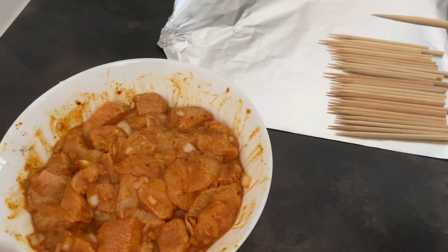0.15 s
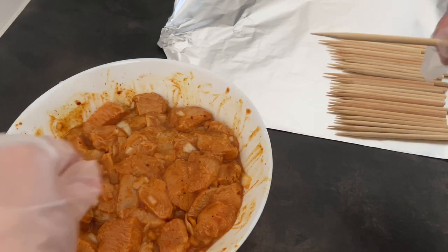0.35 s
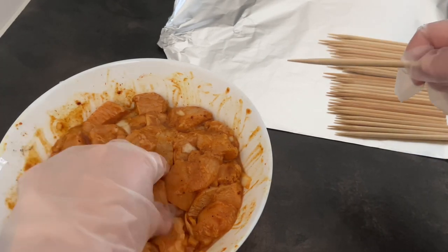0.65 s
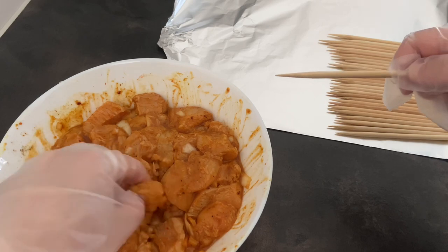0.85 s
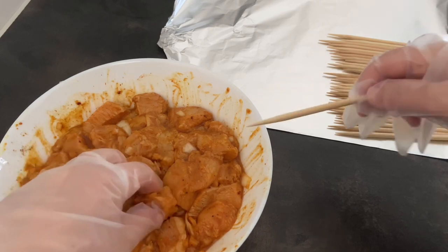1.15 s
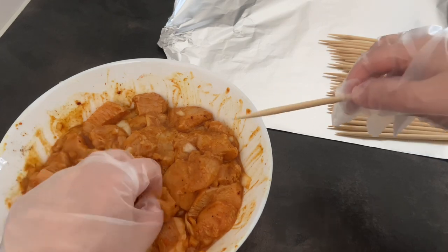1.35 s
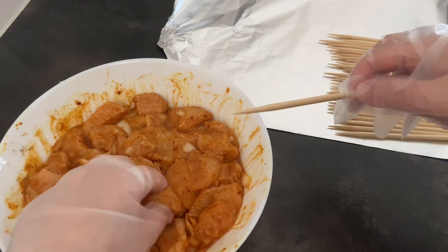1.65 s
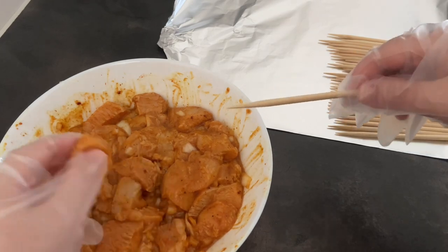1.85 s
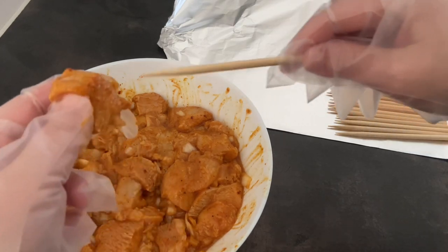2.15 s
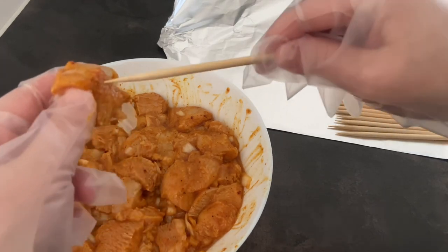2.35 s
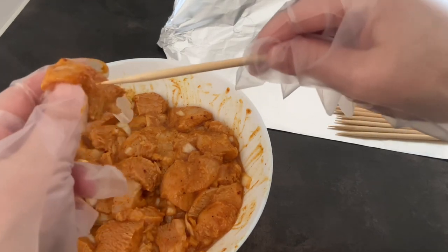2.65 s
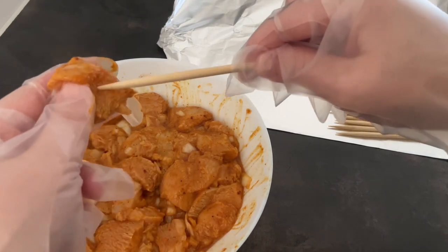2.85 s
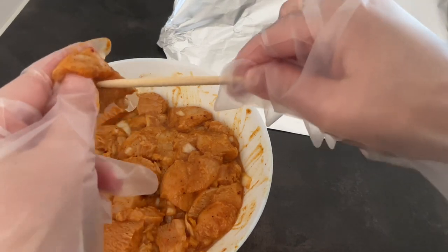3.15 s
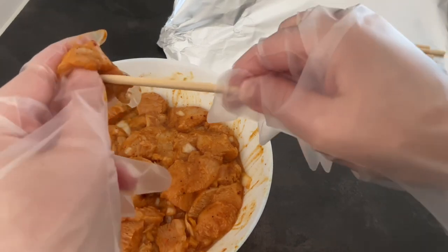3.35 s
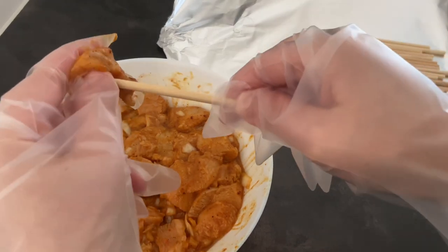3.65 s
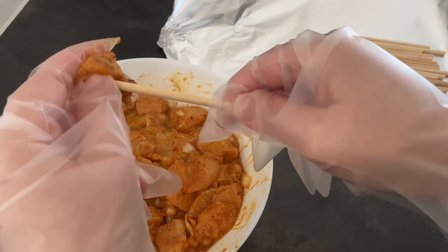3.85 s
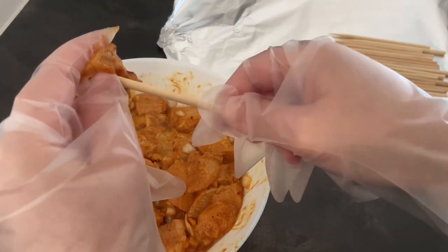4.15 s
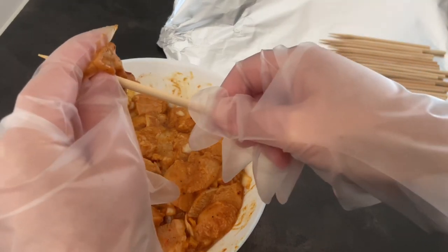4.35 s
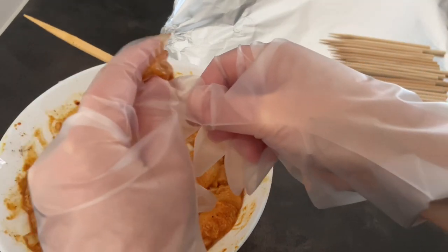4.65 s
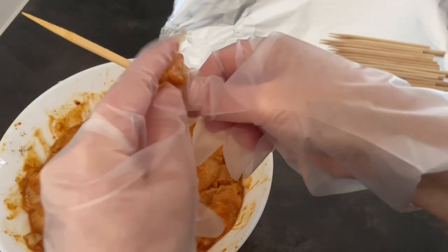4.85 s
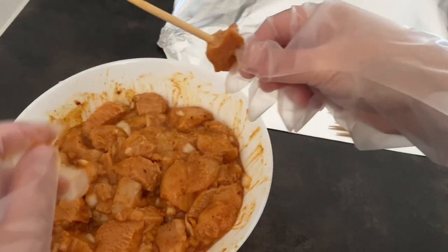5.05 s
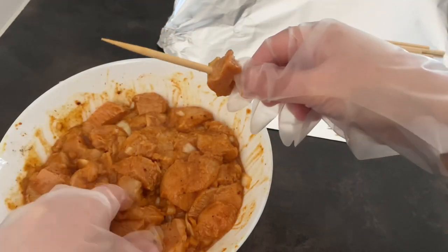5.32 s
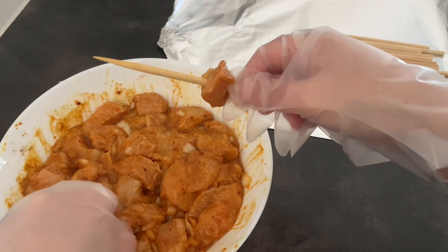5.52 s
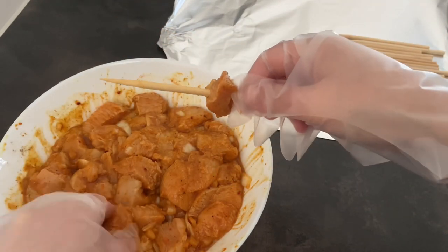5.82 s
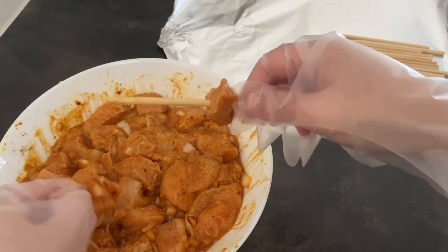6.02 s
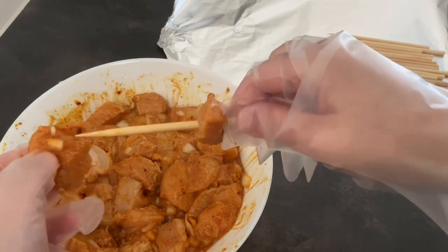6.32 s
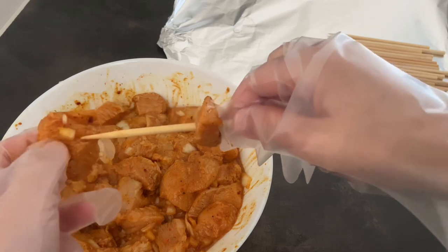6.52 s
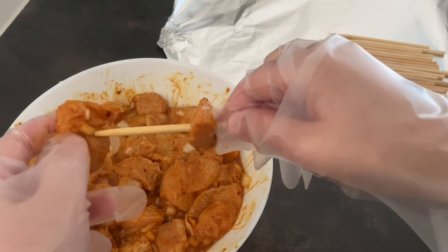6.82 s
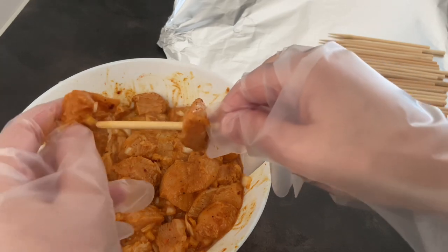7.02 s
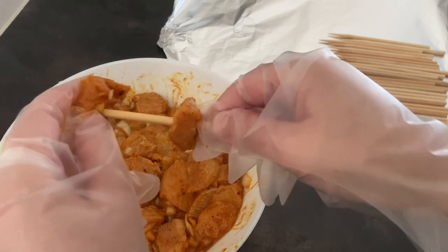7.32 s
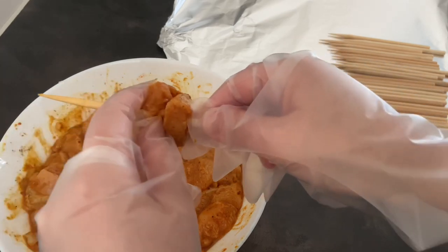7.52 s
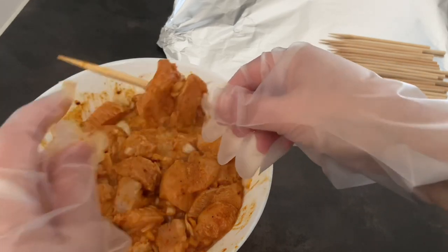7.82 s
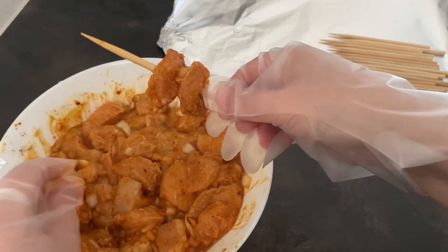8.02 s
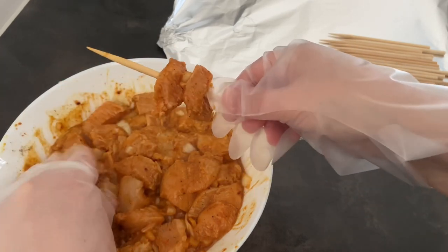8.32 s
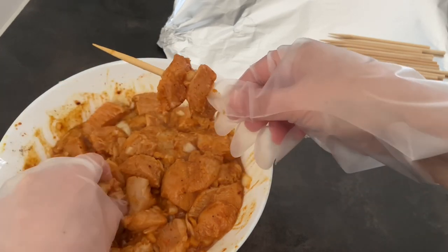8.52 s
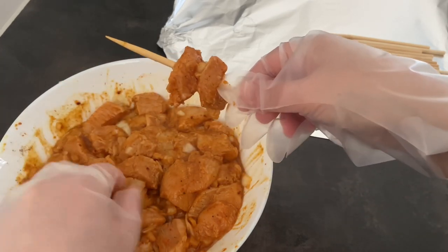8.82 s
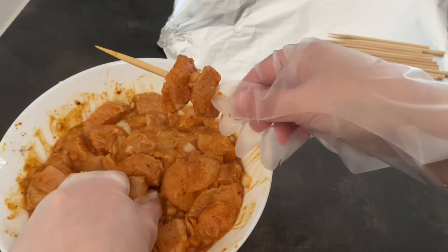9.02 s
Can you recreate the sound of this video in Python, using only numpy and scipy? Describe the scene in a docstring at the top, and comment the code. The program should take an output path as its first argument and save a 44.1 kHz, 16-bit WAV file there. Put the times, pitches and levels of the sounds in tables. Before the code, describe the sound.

Close handling of sticky marinated meat in crackly disposable gloves, with small sharp ticks, moist kneading and a constant deep motor hum.

```python
"""Skewering meat in thin gloves

Heard close up: thin plastic gloves crinkle (clouds of tiny rings over hiss) and snap (struck resonances),
marinated meat squelches and is kneaded (pops over dull noise), and wood rasps and creaks (narrow noise bursts).
Around them a small hard room answers with a noise tail, and soft bumps of bowl and hands come through.
In the background an appliance hums: drifting sines with overtones, a rush of air and a thin whistle."""
import sys
import numpy as np
from scipy import signal
from scipy.fft import rfft, irfft, next_fast_len
from scipy.io import wavfile
from scipy.ndimage import uniform_filter1d, map_coordinates

SR = 44100
rng = np.random.default_rng(int(sys.argv[2]) if len(sys.argv) > 2 else 0)


def master_out(mix):
    """Clip the mix to full scale and print it as 16-bit PCM to the path in sys.argv[1]."""
    frames = np.transpose(np.atleast_2d(mix))
    ceiling = np.clip(frames, -1, 1)
    pcm = np.round(ceiling * 32767).astype(np.int16)
    wavfile.write(sys.argv[1], SR, pcm)


N = 404397

# In all tables a positive left-right level means louder on the left.
# bouts of handling (reaching, digging in the bowl, threading, letting go), levels before each source's trim:
# [start t/s, hold/s, rise time constant/s, film level/dB, sauce level/dB, kneading level/dB]
BOUTS = [(0.0, 0.38, 0.00022, -61.5, -67.5, -60), (0.481, 0.81, 0.0045, -65, -68.5, -62.5),
         (1.362, 0.24, 0.0091, -72.5, -67.5, -62.5), (1.666, 0.24, 0.017, -65, -72.5, -62.5),
         (1.966, 0.23, 0.027, -71, -77, -69), (2.852, 0.61, 0.021, -81, -85.5, -89),
         (4.046, 0.1, 0.031, -72.5, -79, -71), (4.643, 0.091, 0.039, -70.5, -67.5, -72),
         (4.811, 1.07, 0.01, -65, -72.5, -66.5), (5.884, 0.35, 0.02, -67.5, -78.5, -68),
         (6.776, 0.32, 0.0089, -76, -87, -74), (7.562, 0.29, 0.039, -68.5, -73.5, -70),
         (7.928, 0.32, 0.04, -68.5, -75.5, -74), (8.225, 0.89, 0.017, -64, -66, -66.5)]
# squeezes of the fingers within a bout: [start t/s, hold/s, film level/dB, sauce level/dB]
SQUEEZES = [(0.201, 0.023, -53.5, -72), (0.519, 0.028, -58, -56.5), (0.652, 0.034, -56.5, -64.5),
            (0.916, 0.17, -70, -67), (1.142, 0.071, -55.5, -62.5), (1.37, 0.037, -57.5, -56.5),
            (1.49, 0.069, -57.5, -69), (1.809, 0.15, -62, -65.5), (1.878, 0.016, -49, -81),
            (2.46, 0.04, -71.5, -69), (3.099, 0.019, -59, -69), (4.191, 0.025, -66, -88),
            (4.685, 0.027, -57.5, -65), (4.824, 0.086, -63, -68), (5.188, 0.15, -63, -64.5),
            (5.402, 0.13, -65, -67.5), (5.644, 0.15, -61, -62.5), (5.957, 0.11, -62, -82),
            (7.66, 0.093, -68.5, -83), (8.276, 0.086, -68, -60.5), (8.512, 0.05, -83, -60),
            (8.786, 0.044, -57.5, -66), (8.877, 0.027, -61, -62)]
# hands held still: [film level/dB, sauce level/dB, kneading level/dB]
REST_LEVELS = [-81.5, -87, -71]
# single folds buckling and wet contacts parting, smack relative to the snap and before its trim:
# [t/s, relative level/dB, ring f/Hz, left-right level/dB, smack level/dB]
SNAPS = [(0.0779, -30.5, 6150, -0.5, -22), (0.1142, -41, 4270, -4, -22), (0.211, -47.5, 3750, -7, -33),
         (0.241, -44.5, 5370, -4, -19), (0.3893, -45.5, 4330, 4, -44), (0.4968, -46, 1480, 4, -17),
         (0.499, -44, 5960, 0, -25), (0.5347, -41, 6670, -3, -24), (0.5405, -43.5, 5360, 4, -32),
         (0.6255, -52, 5900, -6, -30), (0.6774, -52, 4690, 2, -15), (0.809, -39.5, 3550, -1, -35),
         (0.8218, -45.5, 4730, 5, -25), (0.9795, -45, 1440, -3, -26), (1.063, -45, 1440, -4, -29),
         (1.0775, -47, 4160, -5, -23), (1.149, -46, 2620, -3, -16), (1.1615, -41.5, 7400, -4, -18),
         (1.2397, -46.5, 4910, -2, -30), (1.2596, -35.5, 4730, 5, -30), (1.261, -37, 2540, -3, -30),
         (1.2894, -44, 4100, -1, -15), (1.3796, -41, 4560, -3, -30), (1.3922, -40.5, 4530, 4, -9),
         (1.4025, -47, 2400, 4, -13), (1.5062, -44.5, 3950, 0, -18), (1.5427, -48, 2180, -1, -22),
         (1.5813, -51, 2270, -1.5, -22), (1.594, -44, 2000, -2, -18), (1.6559, -42.5, 2230, 0, -21),
         (1.7253, -42, 2580, -3, -10), (1.8895, -44, 4170, -9, -15), (1.954, -44.5, 2630, -3, -15),
         (2.0344, -48.5, 5600, 0, -41), (2.177, -53, 2160, -5, -13), (2.2233, -52.5, 1250, -3, -18),
         (2.2613, -43.5, 4300, -1, -7.5), (2.488, -52, 2220, -1, -14), (3.027, -44, 4940, 0, -16.5),
         (3.1032, -48, 2840, -6, -23), (3.1138, -48, 4970, 7, -22), (3.369, -56, 1200, 0, -9),
         (3.4659, -46.5, 5870, 1, -19), (3.5136, -52.5, 2600, -1, -23), (3.7652, -56, 2130, 1, -5),
         (3.939, -61, 1330, 3, -23), (4.13, -56.5, 2400, -2, -2), (4.1744, -38.5, 7300, 3, -38),
         (4.604, -60.5, 1420, -1, 0), (4.6925, -47.5, 5530, -6, -7), (4.7082, -45.5, 1100, -13, -2.5),
         (4.716, -50, 1980, 2, -12), (4.7192, -37.5, 5760, 4, -22), (4.904, -43, 6560, 6, -23),
         (5.025, -44.5, 4100, 0, -11), (5.034, -46, 5230, -3, -15), (5.117, -49, 4700, 5, -30),
         (5.1616, -55, 5200, -6, -29), (5.2088, -43, 6540, 0, -22), (5.3954, -48.5, 6100, 3, -12),
         (5.432, -48.5, 2410, -2, -27), (5.558, -58, 4480, -1.5, -5), (5.5678, -37.5, 5300, -1, -40),
         (5.58, -49, 4520, -3, -30), (5.6248, -45.5, 4000, 0, -11), (5.667, -43.5, 2820, -3, -22),
         (5.6742, -35, 4740, -2, -29), (5.7073, -47, 4200, 0, -24), (5.7377, -40, 4530, 3, -17),
         (5.81, -42.5, 5400, 3, -20), (5.869, -53, 4370, 2, -11), (5.8822, -44.5, 4740, -2, -30),
         (6.0715, -49.5, 4700, 3, -21), (6.234, -49.5, 6030, 3, -12), (6.27, -49, 4570, 2, -28),
         (6.2887, -52, 5130, 2.5, -14), (6.7346, -50.5, 4900, 2, -26), (6.8069, -47, 5300, 4, -11),
         (6.809, -56, 990, 0, -26), (6.9521, -50, 4670, -0.5, -14.5), (7.6778, -46.5, 5490, 2, -12.5),
         (7.7336, -50, 5030, 1, -14), (8.011, -43, 5260, 2, -31), (8.0625, -43.5, 5070, 0, -13.5),
         (8.1825, -46.5, 6530, 2, -38), (8.2912, -50, 1480, 1, -13), (8.3172, -46, 4360, 6, -17),
         (8.3543, -37.5, 1680, -7, -10.5), (8.4762, -45, 2090, -4, -20), (8.499, -40, 4450, -2, -29),
         (8.5174, -40.5, 1470, -2, -20), (8.547, -48, 1490, -3, -29), (8.63, -45.5, 1360, -10, -22),
         (8.67, -45, 4300, 3, -15), (8.7144, -49, 4330, 1, -27), (8.744, -33.5, 4600, -2, -39),
         (8.8124, -41.5, 1280, -6, -14), (8.8807, -48, 4230, -3, -20), (8.9247, -46.5, 1250, -2, -12),
         (8.9677, -43, 6400, 1, -22), (9.0353, -43, 2840, -2, -8), (9.0745, -48, 1020, 2, -23)]
# meat squeezed between the fingers: [centre t/s, level before the window/dB, centre f/Hz, half-length/s]
SQUISHES = [(3.893, -69, 804, 0.028), (3.93, -71, 760, 0.05), (4.21, -70.5, 750, 0.042),
            (4.29, -78.5, 900, 0.056), (4.713, -57.5, 1020, 0.012), (4.724, -67, 615, 0.021),
            (5.255, -64.5, 746, 0.088), (5.275, -64.5, 1360, 0.075), (5.525, -64.5, 810, 0.028),
            (5.93, -65.5, 620, 0.044), (8.325, -61.5, 764, 0.018)]
# meat sliding down the wood: [centre t/s, level before the window/dB, centre f/Hz, half-length/s]
SLIDES = [(4.51, -80, 5460, 0.14), (7.35, -69.5, 6500, 0.063), (7.42, -70, 6500, 0.09)]
# the stick creaking: [centre t/s, level before the window/dB, centre f/Hz, half-length/s]
CREAKS = [(3.805, -80, 2360, 0.032), (4.095, -79, 2350, 0.039), (4.151, -73, 2390, 0.01)]
# soft bumps of the bowl and hands: [centre t/s, level before the window/dB, centre f/Hz, half-length/s]
BUMPS = [(1.46, -52, 59.6, 0.054), (1.56, -54.5, 196.5, 0.05), (1.675, -52, 189, 0.03),
         (3.52, -51, 98.6, 0.037), (3.83, -53, 57, 0.067), (6.12, -54, 95, 0.15), (6.27, -49, 53.4, .12),
         (6.5, -58, 104, 0.054), (8.53, -60, 208, 0.097)]
# colour of the glove film: [f/Hz, relative level/dB]
FILM_COLOUR = [(800, -12), (1500, -19), (2500, -12), (3400, -13), (4400, -5.5), (5500, -4.5), (7000, -1.5),
               (8500, -7), (10500, -8.5), (12500, -24), (15000, -36.5)]
# colour of the sticky sauce: [f/Hz, relative level/dB]
SAUCE_COLOUR = [(300, -16), (600, -8), (950, -5), (1350, -2), (1800, -6.5), (2400, -2.5), (3200, -7),
                (6000, -15)]
# colour of the kneaded meat: [f/Hz, relative level/dB]
KNEAD_COLOUR = [(50, -11.5), (105, 9.5), (145, 2.5), (200, 1.5), (260, -3.5), (420, -2), (600, -9.5),
                (850, -43), (2500, -51.5)]
# reverberation time of the room: [f/Hz, t60/s]
ROOM_T60 = [(200, 0.29), (1500, 0.25), (5000, 0.37), (11000, 0.039)]
# where the hum is heard as its standing wave shifts: [t/s, left-right level/dB]
HUM_PAN = [(0, -4.5), (2.7, -3.5), (4.1, 4), (5.5, 6), (9.17, 6)]
# drift of the hum: [t/s, f/Hz, phase by which the left leads/rad]
HUM_DRIFT = [(0, 72.7, -1.85), (2.5, 72.7, -1.8), (3.1, 72.2, -1.6), (3.7, 72, -.7), (4.3, 72.2, 0),
             (5, 72.7, .13), (9.17, 72.75, .14)]
# octave of the hum: [t/s, peak level midway between the sides/dB]
HUM_OCTAVE = [(0.0, -68), (2.41, -66.5), (3.35, -83.5), (4.28, -84.5), (5.37, -72.5), (9.1, -71)]
# overtones of the hum: [multiple of its pitch, level relative to the hum/dB]
HUM_OVERTONES = [(4, -39), (7, -43.5), (8, -43.5), (10, -42), (15, -54)]
# colour of the appliance's air: [f/Hz, relative level/dB]
AIR_COLOUR = [(25, -8), (50, 8.5), (100, 4), (150, -5), (200, -6.5), (260, -15), (400, -24.5), (560, -6),
              (700, -11), (900, -20), (1080, -18.5), (1400, -35.5), (4200, -30.5), (7000, -37),
              (12000, -37.5)]

LEAD_S = .00027  # crackles and snaps reach the left microphone this much earlier, on average
BOUT_T60_S = 0.57  # the hands come to rest slowly
SQUEEZE_RISE_S, SQUEEZE_T60_S = 0.0076, 0.12
SETTLE_DB, SETTLE_T60_S = -22.5, 0.12  # crinkling after a snap, relative to that snap's table level
FIDGET_DB, FIDGET_PER_S = 1.42, 24  # the grip is never quite even
GIVING_PER_S = 170  # film and sauce give way together, in small jerks
KNEAD_UNEVEN_DB = 1.4
FOLD_Q, FOLD_LOWER, FOLD_LOWER_SHARE = 5.5, 0.537, 0.11  # sharpness; second ring's pitch ratio and strength
FOLD_BODY, FOLD_BODY_Q = .38, 1.0  # the broader crack of the film around a fold: strength and sharpness
WET_FILM_DB, WET_SNAP_DB = -3.5, -5  # what is sent to the room
HUM_DB, HUM_START_DB, HUM_SWELL_S = -43, -2, 0.69  # level, offset at the start, time to fill out
TOP_HZ = 14700  # band limit of the microphones
SIDES = np.array([[.5], [-.5]])  # left, right halves of a difference


def gloves(level_db, giving):
    """Clumps of tiny buckles in the film over the smooth hiss of film rubbing on film."""
    buckles = grains(rate=2000, centre_hz=4600, spread=.35, cycles=.7, size_db=4,
                     clump_db=4.5 * giving, size=128)
    crackle = creased(coloured(buckles, FILM_COLOUR), depth_db=3)
    rub = coloured(rng.standard_normal((2, N)), FILM_COLOUR)
    busy = np.clip((level_db + 87.0) / 14, 0, 1)  # resting hands crackle less
    film = busy * crackle + amp(-14) * rub
    return amp(level_db - 3.5) * film


def snaps():
    """A fold flips with a sharp tick after a faint rising swell and flutters; wet film adds a lower smack."""
    early = .006  # s of faint swell ahead of the flip
    track, t = np.zeros((2, N)), np.arange(SR // 14) / SR - early
    after = np.maximum(t, 0)
    lead_in = .22 * amp(60 * np.minimum(t, 0) / .02)
    flutter = amp(-60 * after / 0.015) + 0.58 * amp(-60 * after / 0.055)
    trembling = np.where(t < 0, lead_in, flutter)
    trembling /= np.linalg.norm(trembling)
    smack_fade = (t > 0) * amp(-60 * after / 0.039)
    flip = np.array([np.sinc((t + side * LEAD_S / 2) * SR) for side in (1, -1)])
    for s, db, hz, pan_db, smack_db in SNAPS:
        def fold(f):
            ring = resonance(f, hz, FOLD_Q)
            lower = FOLD_LOWER_SHARE * resonance(f, max(hz * FOLD_LOWER, 1300), FOLD_Q)
            # the crack's pitch leans from the ring towards 4500 Hz
            crack = FOLD_BODY * resonance(f, hz ** .75 * 4500 ** .25, FOLD_BODY_Q) ** 2
            return (ring + lower + crack) / (1 + (f / 10000) ** 8)

        chance = rng.standard_normal((5, len(t)))
        tick = filtered(.9 * flip + chance[:2] * trembling, fold)
        tick *= 4.4 / np.linalg.norm(tick, axis=1, keepdims=True)
        smack_noise = 0.07 * chance[2] + chance[3:]  # mostly separate left and right
        smack = filtered(smack_noise * smack_fade, lambda f: resonance(f, 1200, q=0.39) ** 2)
        sound = tick + amp(smack_db - 16.5) * unit(smack)
        add(track, s + .0014 - early, amp(db + SIDES * pan_db) * sound)
    return track


def peeling(film_db, sauce_db, giving):
    """Where wet film lets go of the meat it gives separate, very short, broad ticks."""
    ticks = grains(rate=55, centre_hz=3400, spread=.4, cycles=.4, size_db=3.5,
                   clump_db=4.5 * giving, size=64)
    ticks = unit(filtered(ticks, lambda f: 1 / np.sqrt(1 + (1100 / (f + 1)) ** 6)))  # low cut
    busy = np.clip((film_db + 82) / 12, 0, 1)
    return busy * amp((film_db + sauce_db) / 2 - 4) * ticks


def marinade(level_db, knead_db, giving):
    """Sticky sauce pops and crackles over the dull sound of the meat being kneaded."""
    pops = grains(rate=1200, centre_hz=1800, spread=.4, cycles=.9, size_db=4,
                  clump_db=4.5 * giving, size=256)
    squelch = creased(coloured(pops, SAUCE_COLOUR), depth_db=2.5)
    knead = coloured(hollow(share=0.88), KNEAD_COLOUR) * amp([[-2.5], [1.5]])  # stronger on the right
    knead_level = amp(knead_db + KNEAD_UNEVEN_DB * wobble(18))
    return amp(level_db - 3.0) * squelch + knead_level * knead


def squishes():
    """Meat squeezed between the fingers gives soft, broad bursts of noise."""
    return swells(SQUISHES, q=1.57, grit_db=1.0, apart=0.53)


def skewer():
    """Meat rasps softly down the wood; the thin stick creaks as its point is forced through."""
    drag = amp(-2) * swells(SLIDES, q=0.18, grit_db=2.5, apart=1.0)  # broad wet rub under the rasp
    rasp = swells(SLIDES, q=2.2, grit_db=3.0, apart=1.0)
    slide = filtered(rasp + drag, lambda f: 1 / (1 + (f / 9500) ** 8))
    return slide + swells(CREAKS, q=7.2, grit_db=10.0, apart=1.0)


def bumps():
    """Bowl and hands bump softly: short bursts of low, narrow noise."""
    return swells(BUMPS, q=8.2, grit_db=-5.5, apart=0.81)


def kitchen(x):
    """Close walls and worktop: a dense noise tail, shortest at the top, redrawn every quarter second."""
    track, hop = np.zeros((2, N)), SR // 4
    padded = np.pad(x, ((0, 0), (0, hop)))
    for start in range(0, N - hop // 8, hop):
        hz, t, z = signal.stft(rng.standard_normal((2, SR // 3)), SR, nperseg=256)
        early_walls = 1 + 1.2 * np.exp(-t / .008)
        fade = early_walls * amp(-60 * t / along(ROOM_T60, hz)[:, None])
        tail = signal.istft(z * fade, SR, nperseg=256)[1]
        tail /= np.linalg.norm(tail[0])
        answer = signal.fftconvolve(padded[:, start:start + hop], tail, axes=1)
        add(track, start / SR + 0.001417, answer)  # s on the way to the nearest wall and back
    return track


def appliance():
    """A deep motor hum with faint overtones, the rush of its air and a thin whistle."""
    level_db = HUM_DB + HUM_START_DB * np.clip(1 - np.arange(N) / SR / HUM_SWELL_S, 0, 1)
    pan_db, = curves(HUM_PAN)
    hz, lead = curves(HUM_DRIFT)
    phase = 2 * np.pi * np.cumsum(hz) / SR
    # a standing wave: each side has its own level and phase
    ports = amp(SIDES * pan_db) * np.exp(1j * SIDES * lead)
    ports /= ports.mean(axis=0)
    hum = amp(level_db + 0.46 * wobble(18)) * np.sqrt(2) * np.imag(ports * np.exp(1j * phase))
    octave_level = amp(curves(HUM_OCTAVE)[0] - SIDES * 13.8)  # stronger on the right
    hum += octave_level * np.sin(2 * phase + 0.49 * wobble(1.8))
    for multiple, db in HUM_OVERTONES:
        waver = .2 * np.array([wobble(4), wobble(4)])  # rad, separate for each side
        hum += amp(level_db + db + wobble(3.8)) * np.sqrt(2) * np.sin(multiple * phase + waver)
    air = amp(-65.5) * coloured(hollow(share=1.0), AIR_COLOUR)
    whistle = unit(filtered(rng.standard_normal((2, N)), lambda f: resonance(f, 5080, q=22) ** 2))
    return hum + air + amp(-92.5 + 2 * wobble(4.8)) * whistle


def effort():
    """Levels in dB of film, sauce and kneading: powers of bouts, squeezes and settling add up."""
    power = np.outer(amp(REST_LEVELS) ** 2, np.ones(N))
    for start, length, rise_s, *levels_db in BOUTS:
        add(power, start, np.outer(amp(levels_db) ** 2, stroke(length, rise_s, BOUT_T60_S)))
    for start, length, *levels_db in SQUEEZES:
        squeeze = stroke(length, SQUEEZE_RISE_S, SQUEEZE_T60_S)
        add(power[:2], start, np.outer(amp(levels_db) ** 2, squeeze))
    for start, db, *_ in SNAPS:
        settling = stroke(0, SQUEEZE_RISE_S, SETTLE_T60_S)
        add(power[:1], start, amp(db + SETTLE_DB) ** 2 * settling)
    film_db, sauce_db, knead_db = 10 * np.log10(power)
    fidget = FIDGET_DB * wobble(FIDGET_PER_S)
    return film_db + fidget, sauce_db + fidget, knead_db


def stroke(length, rise_s, t60_s):
    """Power of one movement: it rises, holds for its length and dies away."""
    t = np.arange(int((length + t60_s) * SR)) / SR
    rise = 1 - np.exp(-t / rise_s)
    return (rise * amp(-60 * np.maximum(t - length, 0) / t60_s)) ** 2


def grains(rate, centre_hz, spread, cycles, size_db, clump_db, size):
    """Tiny damped rings, each with its own pitch, strength and place, crowding where clump_db is high."""
    count = int(rate * N / SR)
    when, place, lag = rng.random((3, count))
    due = np.cumsum(amp(clump_db))
    when = np.searchsorted(due, when * due[-1])
    hz = np.clip(centre_hz * np.exp(spread * rng.standard_normal((count, 1))), 200, SR / 3)
    sign = rng.choice([-1, 1], count)
    strength = sign * amp(size_db * np.minimum(rng.exponential(size=count), 2.2))
    turns = hz * np.arange(size) / SR
    ring = np.sin(2 * np.pi * turns) * np.exp(-turns / cycles) * np.sqrt(hz)
    pair = []
    for side in (1, -1):
        offset_s = LEAD_S / 2 + (lag - .5) * .0003
        start = (when - side * offset_s * SR).astype(int).clip(0)
        gain = strength * amp(side * 3.9 * (place - .5))
        where = start[:, None] + np.arange(size)
        pair.append(np.bincount(where.ravel(), (ring * gain[:, None]).ravel(), N)[:N])
    return np.array(pair)


def swells(rows, q, grit_db, apart):
    """Short soft bursts of resonant noise, one for each row; apart is the share unlike left to right."""
    track = np.zeros((2, N))
    for s, db, hz, half_length in rows:
        size = int(2 * half_length * SR)
        noise = rng.standard_normal(size) + apart * rng.standard_normal((2, size))
        stick_slip = amp(grit_db * wobble(300)[:size])
        body = unit(filtered(noise * stick_slip, lambda f: resonance(f, hz, q) ** 2))
        add(track, s - half_length, amp(db) * np.hanning(size) * body)
    return track


def creased(x, depth_db):
    """Folds of changing size favour different pitches from moment to moment."""
    z = signal.stft(x, nperseg=256)[2]
    field = uniform_filter1d(rng.standard_normal(z.shape[1:]), size=6, axis=0)  # smooth over pitch
    field = uniform_filter1d(field, size=14, axis=1)  # and over time
    gain = amp(depth_db * np.clip(unit(field), -2, 2))
    return unit(signal.istft(z * gain, nperseg=256)[1][:, :N])


def hollow(share):
    """Stereo noise, part of which comes off a wall and reaches the right side later."""
    common = share * rng.standard_normal(N)
    return np.array([common, np.roll(common, SR // 1300)]) + rng.standard_normal((2, N))


def coloured(x, spectrum):
    """x shaped by a spectrum, at rms 1."""
    return unit(filtered(x, lambda f: amp(along(spectrum, f))))


def filtered(x, response):
    """x times a response of frequency."""
    n = x.shape[-1]
    m = next_fast_len(n + 4096)  # room for the ringing
    return irfft(rfft(x, m) * response(np.fft.rfftfreq(m, 1 / SR)), m)[..., :n]


def resonance(f, hz, q):
    """Response of one damped mode."""
    return 1j * f * hz / q / (hz * hz - f * f + 1j * f * hz / q)


def along(points, hz):
    """(f/Hz, value) points read on a log axis."""
    f, v = np.transpose(points)
    return np.interp(np.log(hz + 1), np.log(f + 1), v)


def curves(rows):
    """One value per sample for each column after the time."""
    s, *cols = np.transpose(rows)
    return [np.interp(np.arange(N) / SR, s, c) for c in cols]


def wobble(rate):
    """A smooth random curve, rate knots a second."""
    return map_coordinates(rng.standard_normal(int(N * rate / SR) + 4), [np.arange(N) * rate / SR])


def add(track, s, sound):
    """Mix a sound into a track from time s."""
    start = max(round(s * SR), 0)
    track[:, start:start + sound.shape[-1]] += sound[..., :N - start]


def amp(db):
    """Decibels to gain."""
    return 10 ** (np.asarray(db) / 20)


def unit(x):
    """Scale to rms 1."""
    return x / np.sqrt(np.mean(x ** 2) + 1e-20)


def scene():
    """The hands at work close by, the room's answer and the humming appliance behind."""
    film_db, sauce_db, knead_db = effort()
    giving = wobble(GIVING_PER_S)
    work = gloves(film_db, giving) + peeling(film_db, sauce_db, giving)
    work += marinade(sauce_db, knead_db, giving) + squishes() + skewer()
    clicks = snaps()
    echo = kitchen(amp(WET_FILM_DB) * work + amp(WET_SNAP_DB) * clicks)
    return work + clicks + bumps() + echo + appliance()


def record(dry):
    """The microphones fade out in the top octave and keep nothing above the band limit."""
    return filtered(dry, lambda f: (f < TOP_HZ) / np.sqrt(1 + (f / 11500) ** 11))


dry = scene()
out = record(dry)
master_out(out)
```